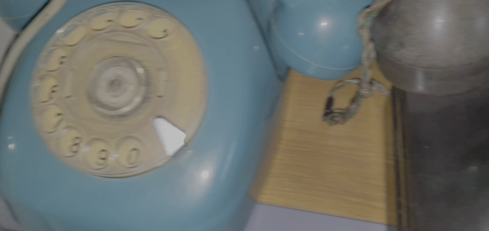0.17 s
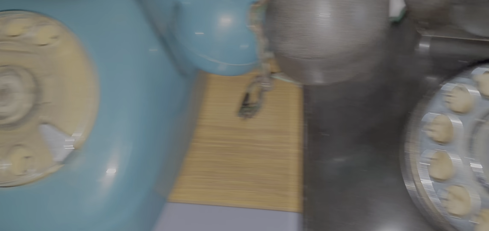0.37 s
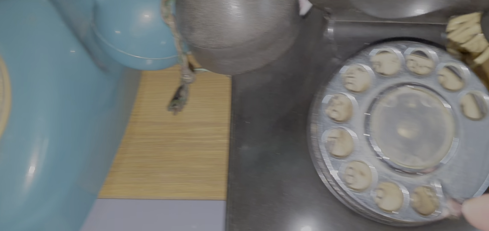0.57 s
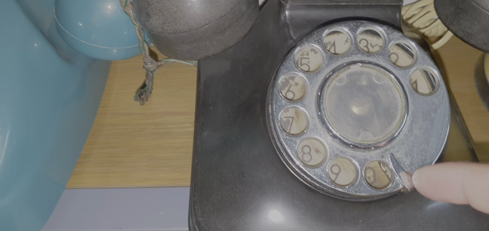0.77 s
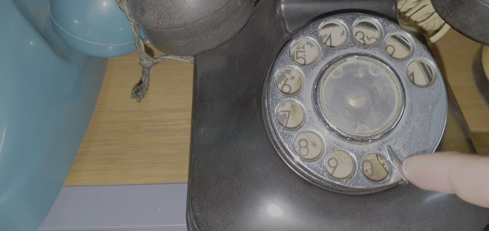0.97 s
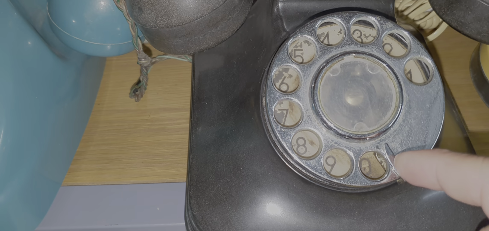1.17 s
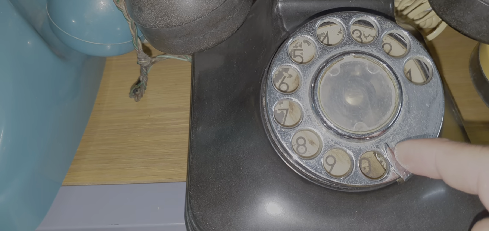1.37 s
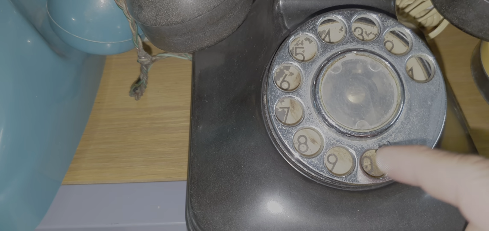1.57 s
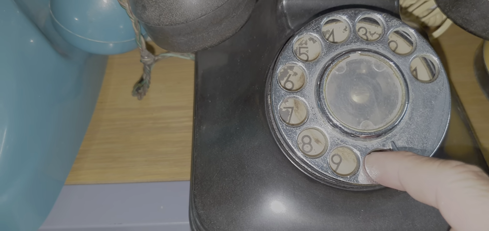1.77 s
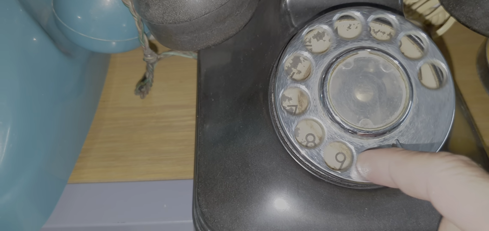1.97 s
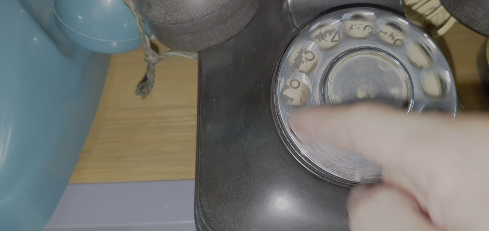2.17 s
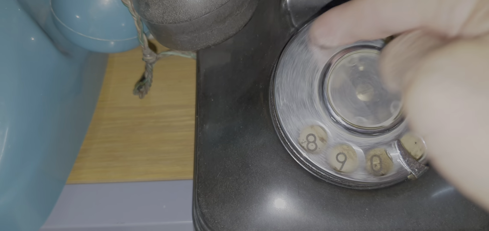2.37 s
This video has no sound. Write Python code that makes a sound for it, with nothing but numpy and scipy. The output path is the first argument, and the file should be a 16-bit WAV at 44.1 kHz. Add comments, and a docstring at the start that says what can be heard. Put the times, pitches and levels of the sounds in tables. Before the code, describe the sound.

Rotary phone dial turned by a finger, gears whirring and clicking over a low wavering room hum

```python
"""A quiet room with a low wavering hum and, close on the left, an old telephone with a metal dial.
A finger brushes the dial, seats itself with two light taps and winds it round, the gears catching with a dull knock.
The gear train whirs: tooth scrapes and friction noise ring the case's resonances, with a throb once a turn
of the fast wheel that settles, slips, brief stalls and singing tones whose pitch follows the wheel's speed.
A pawl clicks in quick chatters of decaying tones and noise, over a thin hiss as it drags."""
import sys
import numpy as np
from scipy import signal
from scipy.fft import rfft, irfft, next_fast_len
from scipy.io import wavfile
from scipy.ndimage import map_coordinates

SR = 44100
rng = np.random.default_rng(int(sys.argv[2]) if len(sys.argv) > 2 else 0)


def master_out(mix):
    """Clip the mix to full scale and print it as 16-bit PCM to the path in sys.argv[1]."""
    frames = np.transpose(np.atleast_2d(mix))
    ceiling = np.clip(frames, -1, 1)
    pcm = np.round(ceiling * 32767).astype(np.int16)
    wavfile.write(sys.argv[1], SR, pcm)


N = 111573  # length in samples

# winding effort, the level of the whir: t/s, level/dB
EFFORT = [(2.02, -63.5), (2.045, -50.5), (2.07, -49), (2.085, -44), (2.125, -36.5), (2.16, -40),
          (2.26, -37.5), (2.355, -37), (2.385, -39), (2.435, -37.5), (2.53, -38.5)]
# resonances of the dial and case: f/Hz, width/Hz, level/dB
CASE_MODES = [(1280, 120, -16), (1557, 25, -2), (1650, 25, -1), (1785, 20, -2), (1933, 25, -1),
              (1990, 25, -3), (2295, 50, -5), (2430, 60, -2), (2525, 40, 2), (3000, 70, 3), (3209, 40, -2),
              (3480, 70, -2), (3878, 50, -3), (4055, 50, -4), (4400, 110, -2), (5000, 100, -6),
              (5380, 150, -9), (5750, 150, -10)]
# broad rattle of the gears: f/Hz, level/dB
RATTLE = [(150, -23), (300, -2), (650, -15.5), (1400, -12.5), (1750, -2.5), (3200, -0.5), (4600, -2.5),
          (5800, -13.5), (6900, -19), (8200, -17.5), (9000, -20.5), (10500, -37), (15000, -52.5)]
# the gears stick, then slip with a sharp scrape: t/s, level/dB
SLIPS = [(2.0445, -46.5), (2.065, -40), (2.103, -42.5), (2.1266, -45), (2.435, -35)]
# the gears stall for an instant: t/s, depth/dB
STALLS = [(2.0635, -10), (2.1175, -9), (2.406, -8), (2.474, -12), (2.5155, -13)]
TEETH_HZ, TOOTH_SCATTER = 330, .15  # contacts a second; timing scatter as a share of the gap
TOOTH_DB, TOOTH_T60_S = 2.2, .013  # size scatter and decay of one contact
RUB_DB = -8  # sliding noise under the contacts
GAP_HZ, GAP_DB = 300, 3  # random loss of contact: knots a second, dB per unit of the curve
THROB_DB, THROB_FADE_S = 2, 0.14  # depth of the throb and how fast it settles
WHEEL_AT_S = 2.107  # one push of the fast wheel
RATTLE_DB, RATTLE_DB_PER_S = -3.5, 14  # over the case's ring as winding starts; grows as the spring tightens
SLIP_T60_S, SLIP_HZ, SLIP_OCTAVES = 0.055, 3280, 0.46
STALL_S = 0.00099  # standard deviation of a stall's bell shape


def gears():
    """Uneven tooth scrapes, pushed once a turn, stick, slip, rattle and ring the case."""
    t, turn = clock(), turns()
    teeth = tooth_contacts()
    # only the downward half of the curve counts: contact is lost, never gained
    gaps = amp(GAP_DB * np.minimum(wobble(GAP_HZ), 0))
    depth_db = THROB_DB * np.exp(-np.maximum(t - WHEEL_AT_S, 0) / THROB_FADE_S)
    throb = amp(depth_db * np.cos(2 * np.pi * turn))
    stalls = amp(sum(db * np.exp(-.5 * ((t - s) / STALL_S) ** 2) for s, db in STALLS))
    slip_level = sum(amp(db) * dying(s, SLIP_T60_S) for s, db in SLIPS)

    def scrape():
        """Tooth contacts and sliding, both carried by a fresh friction noise."""
        return (teeth + amp(RUB_DB)) * grind(turn)

    rattle = unit(filtered(scrape(), lambda hz: amp(along(RATTLE, hz))))
    case_ring = unit(resonate(scrape(), CASE_MODES))
    rattle_gain = amp(RATTLE_DB + RATTLE_DB_PER_S * (t - EFFORT[0][0]))
    whir = case_ring + rattle_gain * rattle
    running = throb * unit(gaps) * (level(EFFORT) * whir + singing(turn))
    slips = bell(slip_level * rng.standard_normal((2, N)), SLIP_HZ, SLIP_OCTAVES)
    return stalls * (running + slips)


def tooth_contacts():
    """Each tooth contact is a short scrape, uneven in timing and size."""
    chance = rng.standard_normal((2000, 2))
    place = np.arange(len(chance)) + TOOTH_SCATTER * chance[:, 0]
    at = np.round(place * SR / TEETH_HZ).astype(int)
    contacts = np.bincount(np.abs(at), amp(TOOTH_DB * chance[:, 1]), N)[:N]
    return unit(signal.fftconvolve(contacts, dying(0, TOOTH_T60_S))[:N])


# speed of the gear train's fast wheel: t/s, turns a second
SPEED = [(2.05, 41), (2.15, 42), (2.25, 42.2), (2.3, 44.4), (2.34, 45.4), (2.39, 44.3), (2.45, 42.5),
         (2.53, 42)]


def turns():
    """Turns of the fast wheel, counted from one of its pushes."""
    count = np.cumsum(np.interp(clock(), *np.transpose(SPEED))) / SR
    return count - np.interp(WHEEL_AT_S, clock(), count)


REPEAT = .45  # share of the scrape's power that repeats with every turn


def grind(turn):
    """Friction noise; part of it comes round with each turn, so its lines glide with the speed."""
    surface = rng.standard_normal((2, round(SR / SPEED[0][1])))
    passing = np.array([map_coordinates(row, [turn % 1 * len(row)], mode="grid-wrap") for row in surface])
    return np.sqrt(REPEAT) * passing + np.sqrt(1 - REPEAT) * rng.standard_normal((2, N))


# resonances that sing out in turn: t/s, f/Hz, level/dB, standard deviation of the swell/s
SING = [(2.088, 2474, -43, 0.016), (2.13, 3040, -45.5, 0.039), (2.199, 1804, -38.5, 0.046),
        (2.225, 3014, -41, 0.073), (2.295, 2525, -45.5, 0.015), (2.338, 1784, -38, 0.034),
        (2.34, 1944, -41, 0.048), (2.342, 3190, -58, 0.016), (2.43, 1848, -40.5, 0.04)]
# unsteadiness: knots a second, phase drift in radians, level drift in dB
SING_FLUTTER_HZ, SING_DRIFT, SING_FLUTTER_DB = 59.7, .45, 2


def singing(turn):
    """Unsteady metallic tones swell and fade over the whir, their pitch tied to the wheel's speed."""
    t, out = clock(), np.zeros((2, N))
    flutter = lambda: np.array([wobble(SING_FLUTTER_HZ), wobble(SING_FLUTTER_HZ)])
    for s, hz, db, spread in SING:
        cycles = turn * hz / np.interp(s, *np.transpose(SPEED))
        swell = amp(db + SING_FLUTTER_DB * flutter()) * np.exp(-.5 * ((t - s) / spread) ** 2)
        phase = 2 * np.pi * (cycles + rng.random((2, 1))) + SING_DRIFT * flutter()
        out += np.sqrt(2) * swell * np.sin(phase)
    return out


# pawl clicks: t/s, level/dB
PAWL = [(2.2238, 6), (2.2716, -7.5), (2.288, 4.5), (2.3497, 8), (2.4202, -7.5), (2.4923, 8)]
# contacts in one click: delay t/s, level/dB
CHATTER = [(0, -5), (.0011, -5.5), (.0021, -5), (.0045, -11)]
# ring of the pawl: f/Hz, level/dB, t60/s
PAWL_MODES = [(3980, -3, .018), (4300, 0, .02), (5400, -5, .014), (5900, -7, .012), (7950, -5, .014),
              (8330, -4, .016), (9700, -15, .012), (13300, -16, .012)]
CRACK_DB, CRACK_S, CRACK_HZ, CRACK_OCTAVES = -6, 0.0071, 6650, 0.42  # CRACK_S is a t60
DRAG_DB, DRAG_HZ, DRAG_OCTAVES = -63, 12000, .3  # thin hiss of the sliding pawl


def pawl(size_db=-31):
    """Contacts chatter on a small steel spring; a drag fades in from the first click to the second, then stays."""
    rings, cracks, t = np.zeros((2, N + SR)), np.zeros(N), np.arange(SR // 20) / SR

    def mode(hz, db, t60):
        """One decaying tone of the spring, at a random phase on each side."""
        decay = np.exp(-np.log(1000) * t / t60)
        return amp(db) * decay * np.sin(2 * np.pi * (hz * t + rng.random((2, 1))))

    for s, db in PAWL:
        for delay, contact_db in CHATTER:
            size = amp(size_db + db + contact_db)
            start = round((s + delay) * SR)
            rings[:, start:start + len(t)] += size * sum(mode(*row) for row in PAWL_MODES)
            cracks += size * dying(s + delay, CRACK_S)
    drag_rise = np.interp(clock(), [PAWL[0][0], PAWL[1][0]], [0, 1])
    drag = amp(DRAG_DB) * drag_rise * band(DRAG_HZ, DRAG_OCTAVES)
    return rings[:, :N] + amp(CRACK_DB) * cracks * band(CRACK_HZ, CRACK_OCTAVES) + drag


# knocks of the finger wheel and, last, of the gears catching:
# t/s, level/dB, centre f/Hz, width/octaves, lowest f/Hz, case thud level/dB
KNOCKS = [(1.8848, -10, 3840, 0.66, 2200, -22), (1.9803, -7.5, 3210, 0.52, 1800, -18),
          (2.0786, -14, 2450, 0.45, 900, -7)]
# a knock's snap, ring and tail: level/dB, t60/s
KNOCK_DECAY = [(1, 0.0056), (-8.5, 0.035), (-22.5, 0.32)]
# ring of the finger wheel: f/Hz, width/Hz, level/dB
WHEEL_MODES = [(1330, 60, 5), (1810, 120, 11.5), (2466, 180, 3.5), (3150, 640, 2), (4800, 300, -6)]
# the fingertip brushing the wheel: t/s, level/dB, standard deviation of the stroke/s
BRUSHES = [(0.975, -63.5, 0.022), (1.586, -69, 0.023), (1.942, -66.5, 0.047)]
WHEEL_RING_DB = 5  # gain of the wheel's ring added to the bare knock
THUD_HZ, THUD_OCTAVES, THUD_T60_S = 990, 0.35, 0.28  # the case's dull answer to a knock
BRUSH_HZ, BRUSH_OCTAVES = 3330, 0.79


def finger(knock_db=-30):
    """The fingertip brushes and taps the wheel, then the gears catch; each knock rings the wheel and thuds the case."""
    out = np.zeros((2, N))
    for s, db, hz, octaves, low_hz, thud_db in KNOCKS:
        decay = sum(amp(part_db) * dying(s, t60) for part_db, t60 in KNOCK_DECAY)
        knock = bell(rng.standard_normal((2, N)) * decay, hz, octaves)
        thud_noise = rng.standard_normal((2, N)) * dying(s, THUD_T60_S)
        thud = amp(thud_db) * bell(thud_noise, THUD_HZ, THUD_OCTAVES)
        ring = amp(WHEEL_RING_DB) * resonate(knock, WHEEL_MODES)
        out += amp(db + knock_db) * (low_cut(knock + ring, low_hz) + thud)
    touch = sum(amp(db) * np.exp(-.5 * ((clock() - s) / spread) ** 2) for s, db, spread in BRUSHES)
    skin = band(BRUSH_HZ, BRUSH_OCTAVES)
    return out + touch * unit(resonate(skin, WHEEL_MODES))


# level of the wavering hum: t/s, level/dB
HUM = [(0, -31), (.12, -49.5), (.22, -31.5), (.32, -44), (.44, -30.5), (.52, -38), (.58, -57), (.64, -37),
       (.74, -35.5), (.83, -46), (.95, -33.5), (1.02, -47), (1.08, -35), (1.18, -37), (1.225, -48.5),
       (1.29, -38.5), (1.39, -32), (1.48, -36), (1.54, -57), (1.61, -35.5), (1.7, -34), (1.76, -49),
       (1.83, -35), (1.98, -34.5), (2.04, -38.5), (2.53, -41)]
# other steady machine tones: f/Hz, level/dB
TONES = [(48.7, -50.5), (101.5, -52.5), (162.3, -57), (249, -61.5), (396, -71.5)]
# colour of the room noise: f/Hz, relative level/dB per Hz
AIR = [(25, -15), (42, -8.5), (65, -1.5), (125, 2), (190, -8), (300, -14.5), (550, -22), (1000, -29),
       (1550, -38.5), (2200, -37), (2900, -44.5), (4950, -46.5), (5700, -56), (15000, -59)]
# left-right likeness of the room noise: f/Hz, likeness (0-1)
AIR_ALIKE = [(130, 0.95), (290, 0.66), (640, .48), (1500, 0.065)]
# tilt of the whole room tone: f/Hz, left minus right level/dB
AIR_PAN = [(60, 1.1), (700, 3.5), (1400, 9.5), (4800, 11), (9000, 0.5)]
# narrow bands of hiss that swell and fade: f/Hz, level/dB
HISS = [(1320, -82.5), (2080, -79.5), (3450, -83.5), (4880, -84)]
HUM_HZ, HUM_DRIFT = 61.4, .15  # drift of the phase in radians
AIR_DB = -47
HISS_OCTAVES, HISS_DRIFT_HZ, HISS_DRIFT_DB = .14, 3, 2  # width, drift in knots a second, drift in dB


def room_tone(tone_drift=0.29):
    """A wavering hum, a few weak tones, soft steady noise and narrow hisses that swell and fade."""
    t = clock()
    hum_level = amp(np.interp(t, *np.transpose(HUM)))
    hum = hum_level * np.sin(2 * np.pi * HUM_HZ * t + HUM_DRIFT * wobble(3.1))
    tones = sum(amp(db) * np.sin(2 * np.pi * (hz * t + rng.random()) + tone_drift * wobble(3))
                for hz, db in TONES)

    def mid_side_colour(hz):
        """Share the noise between middle and sides so left and right are as alike as wanted."""
        angle = np.arccos(np.clip(along(AIR_ALIKE, hz), -1, 1)) / 2
        return amp(along(AIR, hz)) * [np.cos(angle), np.sin(angle)]

    mid, side = filtered(rng.standard_normal((2, N)), mid_side_colour)
    air = amp(AIR_DB) * unit(np.array([mid + side, mid - side]))
    hiss = sum(amp(db + HISS_DRIFT_DB * wobble(HISS_DRIFT_HZ)) * band(hz, HISS_OCTAVES) for hz, db in HISS)
    return panned(np.sqrt(2) * (hum + tones) + hiss + air, AIR_PAN)


def amp(db):
    """Gain of a level in dB."""
    return 10 ** (np.asarray(db) / 20)


def unit(x):
    """x at rms 1."""
    return x / np.sqrt(np.mean(x ** 2) + 1e-20)


def along(points, hz):
    """(Hz, value) points on a log axis."""
    f, v = np.transpose(points)
    return np.interp(np.log(hz + 1), np.log(f + 1), v)


def clock():
    """The time of each sample in seconds."""
    return np.arange(N) / SR


def level(rows):
    """Gain per sample from (s, dB) points; practically silent before the first."""
    return amp(np.interp(clock(), *np.transpose(rows), left=-120))


def wobble(rate):
    """A smooth random curve, rate knots a second, mirrored when its 400 knots run out."""
    return map_coordinates(rng.standard_normal(400), [clock() * rate], mode="mirror")


def filtered(x, response):
    """x times a response of frequency, real or complex."""
    m = next_fast_len(N + SR // 2)
    return irfft(rfft(x, m) * response(np.fft.rfftfreq(m, 1 / SR)), m)[..., :N]


def resonate(x, modes, skirt_octaves=0.28):
    """x through (Hz, width Hz, dB) resonances with short skirts."""
    def mode(f, c, w, db):
        """One resonance, its far skirts cut by a bell."""
        skirt = np.exp(-.5 * (np.log2((f + 1) / c) / skirt_octaves) ** 2)
        return amp(db) * skirt * 1j * f * w / (c * c - f * f + 1j * f * w)

    return filtered(x, lambda f: sum(mode(f, *row) for row in modes))


def bell(x, hz, octaves):
    """x through a bell-shaped band around hz; white noise keeps its level."""
    gain = lambda f: np.exp(-.5 * (np.log2((f + 1) / hz) / octaves) ** 2)
    return filtered(x, lambda f: unit(gain(f)))


def band(hz, octaves):
    """Two unrelated noises of about rms 1 in a bell around hz."""
    return bell(rng.standard_normal((2, N)), hz, octaves)


def low_cut(x, hz, order=6):
    """x with what lies below hz steeply cut."""
    return signal.sosfilt(signal.butter(order, hz, "high", fs=SR, output="sos"), x)


def dying(start, t60):
    """An envelope that jumps to 1 and falls by 60 dB in t60 seconds."""
    age = clock() - start
    return (age >= 0) * np.exp(-np.log(1000) * np.abs(age) / t60)


def panned(pair, pan):
    """Tilt a stereo pair by (Hz, left minus right dB)."""
    return filtered(pair, lambda hz: amp(along(pan, hz) * np.array([[.5], [-.5]])))


def echo(x, t60):
    """x through a fresh diffuse tail of energy 1."""
    tail = rng.standard_normal(N) * dying(0, t60)
    return signal.fftconvolve(x, tail / np.linalg.norm(tail))[:N]


# the dial is to the left: f/Hz, left minus right level/dB
PAN = [(150, 3), (700, 4), (1300, 10), (2400, 13), (8100, 8.5), (15000, 6)]
# roll-off of the top treble: f/Hz, level/dB
TREBLE = [(14000, -3.5), (15200, -20)]
DIAL_ALIKE = .4  # left-right likeness of the dial's sound (0-1)
WET_DB, ROOM_T60_S = -16, 0.12  # the room's answer


def scene():
    """The left side faces the dial; the right hears it weaker and partly by reflection."""
    near, other = gears() + pawl() + finger()
    far = DIAL_ALIKE * near + np.sqrt(1 - DIAL_ALIKE ** 2) * other
    pair = np.array([side + amp(WET_DB) * echo(side, ROOM_T60_S) for side in (near, far)])
    dial = filtered(panned(pair, PAN), lambda hz: amp(along(TREBLE, hz)))
    return dial + room_tone()


def record(dry, top_hz=15700):
    """Keep only what lies below the band limit."""
    return filtered(dry, lambda hz: hz < top_hz)


dry = scene()
out = record(dry)
master_out(out)
```